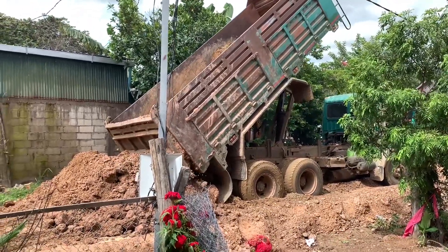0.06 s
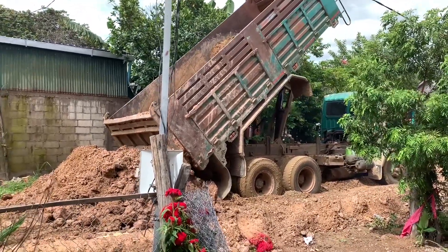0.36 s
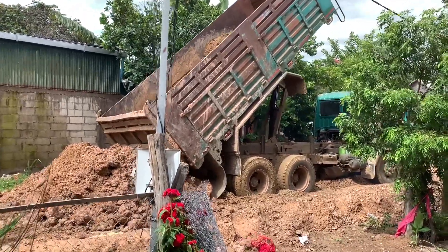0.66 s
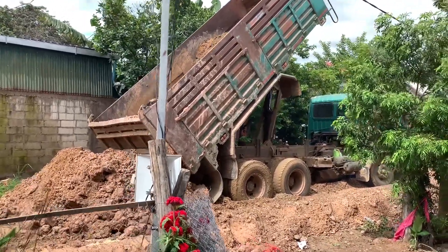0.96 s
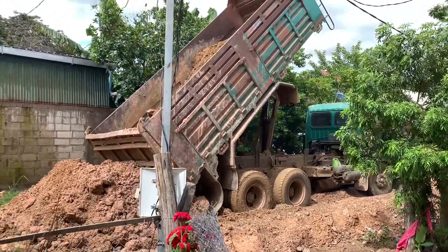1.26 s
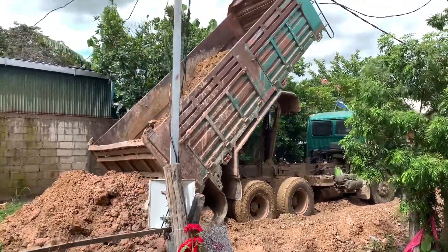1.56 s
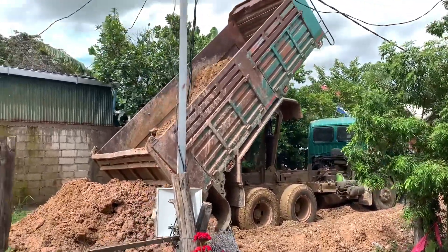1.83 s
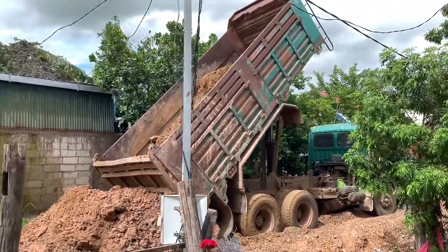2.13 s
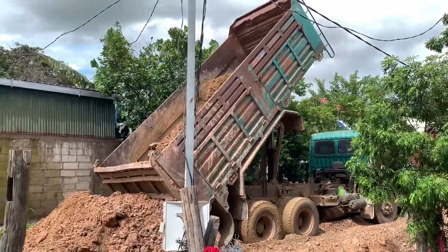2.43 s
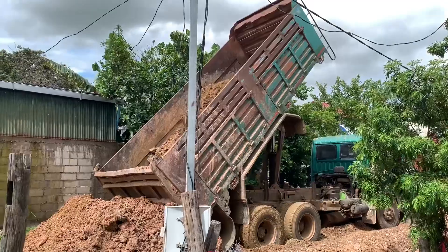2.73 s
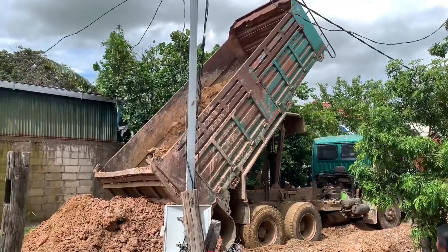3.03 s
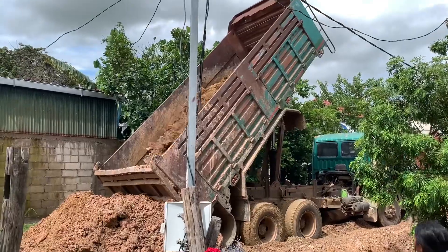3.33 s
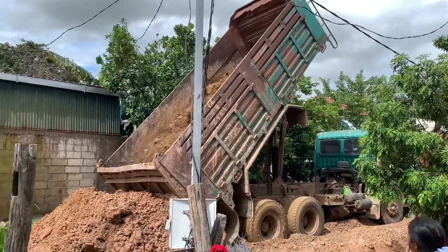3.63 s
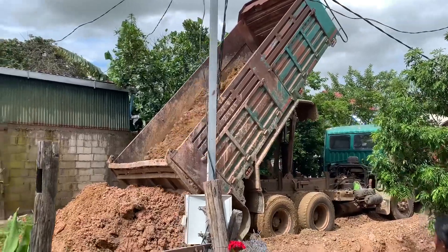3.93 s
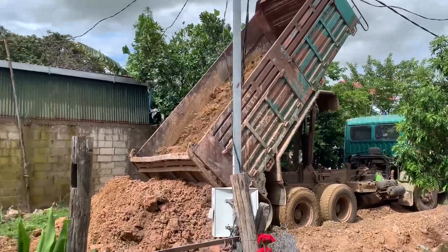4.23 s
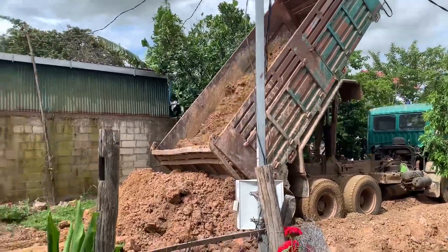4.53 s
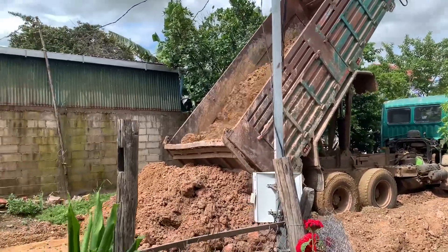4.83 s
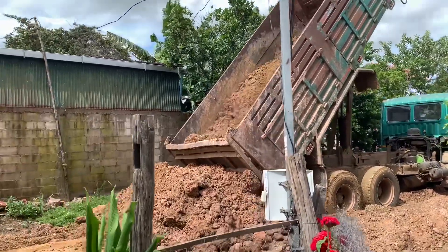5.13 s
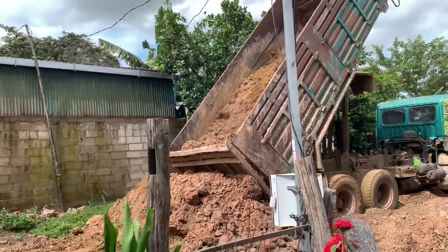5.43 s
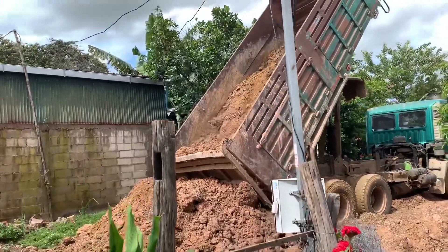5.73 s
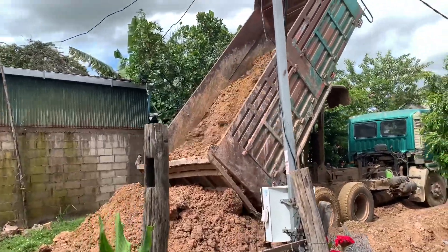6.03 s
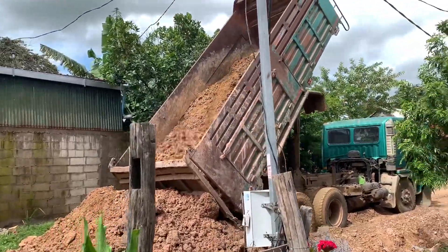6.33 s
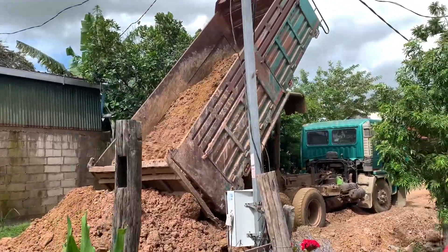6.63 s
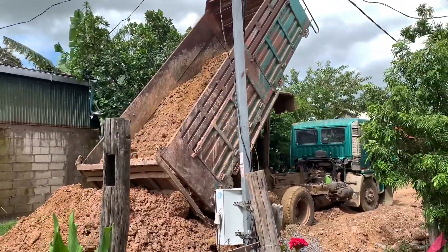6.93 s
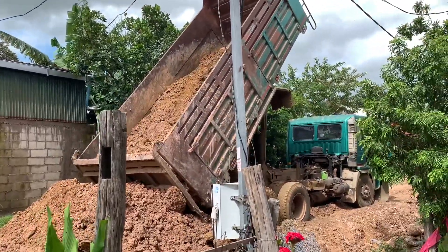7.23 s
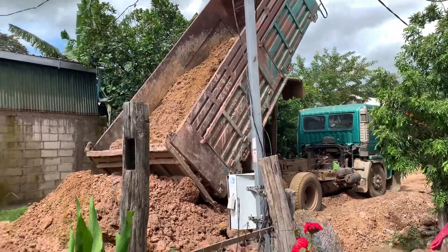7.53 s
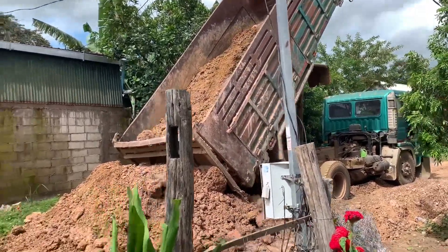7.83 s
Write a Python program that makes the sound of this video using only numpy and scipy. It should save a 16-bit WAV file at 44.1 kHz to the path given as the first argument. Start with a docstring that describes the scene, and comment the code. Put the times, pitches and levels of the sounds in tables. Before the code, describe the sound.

A dump truck's diesel engine throbs and clatters throughout, heard from some metres away in a walled yard. It revs high at about 0.4 seconds and sinks until 1.9, with a fine hydraulic hiss. A thin, faint hoist whine sounds from about 1.6 to 3.5 seconds, as the engine climbs to a second peak. A stone knocks at 2.6 seconds, and a loud cluster of sharp clanks hits the steel bed at 3.3. Soil slides out in a gritty, scraping rush, strongest near 3.8 and fading by 5.5, with many stones knocking and ringing briefly. Heavy clods thud onto the heap around 4.7 and 5.4 seconds, with a tiny stone squeak between. The engine gives a shorter, lighter rev at 5.7 and drops to a quieter idle by 7. A few scattered knocks and soft thuds follow, with a last clod landing at 8 seconds.

```python
"""A V8 diesel throbs and revs in a walled yard: a dump truck, speeding up three times to drive its hoist.
Exhaust pulses boom in the pipe, the block clatters and the hydraulics sing, then the engine drops to idle.
Soil slides down the raised steel bed; stones knock on its floor and heavy clods thud onto the heap.
Heard from some metres away, through the two microphone ports of a hand-held camera."""
import sys
import numpy as np
from scipy import signal
from scipy.fft import rfft, irfft, next_fast_len
from scipy.io import wavfile

SR = 44100
rng = np.random.default_rng(int(sys.argv[2]) if len(sys.argv) > 2 else 0)


def materialize(psi):
    """Save the field psi as 16-bit PCM at rate SR to the path in sys.argv[1].

    A 1-D psi becomes a single channel; in a 2-D psi each row is a channel.
    """
    bounded = np.clip(np.atleast_2d(psi).T, -1, 1)
    quanta = np.round(bounded * 32767).astype(np.int16)
    wavfile.write(sys.argv[1], SR, quanta)


N = 355446
T = np.arange(N) / SR


# Three revs, then idle. Each row: time in seconds, four-stroke cycles a second.
ENGINE_SPEED = [(0.0, 15.92), (0.35, 19.4), (0.51, 18.5), (0.95, 14.09), (1.4, 10.05), (1.85, 7.13),
                (2.25, 9.49), (2.87, 14.1), (3.3, 16.96), (3.54, 17.33), (4.04, 12.52), (4.52, 9.06),
                (4.95, 6.13), (5.25, 7.47), (5.7, 15.04), (5.97, 12.6), (6.52, 9.17), (6.94, 6.75),
                (8.06, 7.29)]
def crankshaft():
    """The engine's pace: cycles a second, and cycles turned so far."""
    speed = curve(ENGINE_SPEED)
    return speed, np.cumsum(speed) / SR


# The hoist's load, which lets go once the bed is up. Each row: time in seconds, load in dB.
HOIST_LOAD = [(0, 1.5), (1.6, -1.5), (3, 1), (4.6, -5), (5.1, -12), (5.45, -6.5), (6.1, -15), (8.06, -31)]
# How hard the exhaust pushes. Each row: time in seconds, level in dB.
EXHAUST_PUSH = [(0, -27), (.35, -26), (.7, -28.5), (1.1, -34.5), (1.42, -35), (1.68, -32.5), (1.9, -34.5),
                (2.25, -31.5), (2.7, -30.5), (3, -29), (3.45, -29), (4.15, -32.5), (4.45, -35.5),
                (4.68, -29), (5.1, -40), (5.6, -36), (5.95, -36), (6.45, -41.5), (8.06, -40)]
# A V8 bank's uneven firing. Each row: multiple of the cycle rate, dB under load, dB change running free.
ENGINE_ORDERS = [(2, -9, 3), (3, 4.5, 4), (4, -2.5, -19), (5, 2, 4), (6, -6, -16), (7, -3.5, 1),
                 (8, 3, -8.5), (9, -10, 1.5), (10, -8, 7), (11, -17, -26), (12, -8, 1), (13, -10, -1),
                 (14, -7.5, -16), (15, -11.5, -1), (16, -4.5, -6.5), (17, -8, -10), (18, -14.5, -14),
                 (20, -6.5, 0), (21, -7, -18), (22, -20.5, 6), (24, -8.5, -4), (32, -12.5, 2)]
# The tailpipe's resonances and its rumble. Each row: frequency in Hz, level in dB.
PIPE_SPECTRUM = [(18, -52), (28, -40), (35, -49), (43, -10.5), (52, -5.5), (63, 1.5), (75, -3), (90, -2.5),
                 (115, -7), (150, -5), (190, -10.5), (240, -1), (280, -9), (308, -6), (345, -12.5),
                 (410, -8.5), (480, -9), (650, -25)]
RUMBLE_SPECTRUM = [(20, -33), (35, 3), (50, 29), (66, 0), (90, 14), (140, 17), (200, 1), (400, -59)]
def exhaust(speed, cycles, tone_db=3, rumble_db=-11, chug_db=0.77, rasp_db=2, ragged_db=4):
    """Engine orders glide through the pipe's resonances and throb once a cycle, over a loose rumble."""
    load_db = curve(HOIST_LOAD)
    running_free = np.clip(-load_db / 10, 0, 1) ** 2
    # no two firings are equally strong
    firings = np.interp(cycles * 8, np.arange(2000), rng.standard_normal(2000))
    tone = np.zeros(N)
    for order, db, free_change_db in ENGINE_ORDERS:
        # low orders arrive as one push a cycle; higher ones are scattered and break up
        phase = 0.035 * order ** 2 + (order > 5) * rng.random()
        phase += 0.0044 * max(order - 8, 0) * wander(11)
        high = np.clip((order * speed - 100) / 130, 0, 1)
        flicker_db = wander(14) + high * ragged_db * (np.clip(wander(9), -2, 1.2) - .5)
        sharpness_db = high * (load_db + rasp_db * firings)  # load sharpens the firing
        level_db = db + running_free * free_change_db + read(PIPE_SPECTRUM, order * speed)
        tone += amp(level_db + sharpness_db + flicker_db) * np.cos(2 * np.pi * (order * cycles - phase))
    rumble = amp(rumble_db) * noise(RUMBLE_SPECTRUM)
    return amp(curve(EXHAUST_PUSH)) * (amp(tone_db + chug_db * firings) * tone + rumble)


# Dull roar and metal clatter at the engine. Each row: frequency in Hz, level in dB.
ROAR_SPECTRUM = [(50, -20.5), (110, 1.5), (160, 2), (195, 1.5), (240, -3.5), (290, -7), (400, -5.5),
                 (520, -0.5), (650, -3), (1200, -12), (3000, -73.5)]
CLATTER_SPECTRUM = [(200, -34.5), (400, -16.5), (520, -1.5), (680, -1), (900, -4.5), (1250, -2),
                    (1750, -2.5), (2100, -5.5), (2480, -30.5), (3600, -22), (5200, -38), (7000, -61),
                    (15000, -68)]
# Ringing engine panels. Each row: pitch in Hz, width in Hz, dB against the clatter.
ENGINE_PANELS = [(1497, 81, -16.5), (1745, 41, -12), (2125, 33, -20.5)]
def engine_block(speed, cycles, idle_roar_db=-55, idle_clatter_db=-54):
    """Each of eight firings a cycle gives a puff of gas and a rattle that rings the panels."""
    pulses = 0.47 + np.exp(-(cycles * 8 % 1) / 0.95)
    roar_gain = np.hypot(effort(speed, db=-38, octave_db=2.5, load_share=1), amp(idle_roar_db))
    clatter_gain = np.hypot(effort(speed, db=-37.5, octave_db=6, load_share=3.36), amp(idle_clatter_db))
    roar = noise(ROAR_SPECTRUM, pulses)
    clatter = noise(CLATTER_SPECTRUM, pulses)
    for hz, width_hz, db in ENGINE_PANELS:
        clatter += amp(db) * resonance(pulses * rng.standard_normal(N), hz, width_hz)
    return roar_gain * roar + clatter_gain * clatter


# Soil giving way on the bed. Each row: time of the peak in seconds, level in dB,
# swell and decay in seconds, dB of its grit against the soil.
SLUMPS = [(3.75, -30.5, 0.36, 0.61, -11), (3.81, -34, 0.01, 0.043, -21), (4.35, -42.5, 0.2, 0.58, -15),
          (5.44, -43, 0.1, 0.027, -18), (5.66, -51, 0.035, 0.045, -12), (6.18, -82, 0.067, 0.12, 19.5),
          (7.38, -54, 0.0091, 0.043, -21)]
def soil_flow():
    """Gain of the sliding soil: the sum of its slumps."""
    return sum(amp(db) * slump(s, swell_s, decay_s) for s, db, swell_s, decay_s, _ in SLUMPS)


# Crumbs on steel. Each row: frequency in Hz, level in dB.
SOIL_SPECTRUM = [(200, -14), (400, -4), (700, 0), (900, 0), (1150, 3), (1600, 4.5), (2000, 1), (2500, -12),
                 (3700, -11), (5200, -15.5), (6500, -24), (7600, -50), (15000, -73)]
def soil(level_db=-1, surge_db=3):
    """Crumbs scrape down the steel in small surges and pour onto the heap with a dull rush."""
    crumbs = unit_rms(colour(grains(per_s=2200, spread_db=0.5), SOIL_SPECTRUM))
    pour = noise(ROAR_SPECTRUM)
    return amp(level_db) * soil_flow() * (amp(surge_db * wander(45)) * crumbs + pour)


# The steel bed when struck. Each row: frequency in Hz, level in dB.
BED_SPECTRUM = [(200, -0.5), (600, 1), (950, 3), (1200, 1), (1500, 8), (1900, 8.5), (2200, 1), (2550, -1),
                (3700, -4.5), (5000, -7), (7400, -18), (8300, -11.5), (11000, -22.5), (15000, -33)]
# Large stones on the bed. Each row: start in seconds, level, treble and crack in dB,
# burst length in seconds, clank pitch in Hz.
STONE_HITS = [(1.9, -43, -10, 0, .008, 1500), (2.56, -25.5, -8, 1, 0.012, 1450),
              (3.281, -9, 0, -14, 0.0019, 2030), (3.284, -15, 1, 1.5, 0.0039, 940),
              (3.288, -10.5, -8, -9, 0.0011, 1800), (3.295, -9, 8, -15, 0.0025, 1630),
              (3.318, -20.5, 8, -8, 0.0097, 1920), (3.622, -19.5, -9, 9, 0.0073, 1410),
              (3.685, -30, 4, 0, 0.0059, 1600), (3.722, -24, -3, 4, .008, 1800),
              (3.788, -20.5, -12, -2, 0.0038, 2000), (3.802, -21, -4, 5, 0.008, 1440),
              (3.843, -20, 2, -6, 0.0042, 1740), (4.081, -20.5, -4, -2, 0.0017, 1820),
              (4.107, -16.5, 0, -2, 0.0021, 1610), (4.239, -19, -4.5, 5, 0.0031, 1840),
              (4.370, -24.5, -16, -10, 0.0016, 1670), (4.388, -28, -14, -6, 0.0033, 1553),
              (4.418, -14.5, -2, 5, 0.0028, 1490), (4.449, -26, -4, -8, 0.0026, 1390),
              (4.483, -13, -5, -3, 0.0019, 1660), (4.736, -22, -8, 6, 0.0016, 1950),
              (4.782, -22, -9, -5, 0.0024, 1600), (4.844, -19, 2.5, 2.5, 0.0023, 2020),
              (5.028, -22.5, -14, -1, 0.0029, 1755), (5.101, -27.5, -17, -3, 0.0022, 1800),
              (5.114, -29, -26, -14, 0.0021, 1570), (5.204, -22.5, -8.5, 13, 0.0032, 1700),
              (5.447, -18.5, -8, 2, 0.0042, 1638), (5.455, -35, -11, 0, 0.0024, 1860),
              (5.571, -44, -5, -13, 0.00087, 900), (6.605, -25, -12, 7, 0.0018, 1750),
              (6.622, -36, -7, 5, 0.0061, 1560), (6.906, -49, -16, 0, 0.0053, 1360),
              (7.064, -39.5, -14, 0, 0.0028, 1750), (7.073, -34.5, -13, 5, 0.004, 1450),
              (7.088, -38.5, -21, 0, 0.01, 1370), (7.378, -45, -4, 9, .006, 1510),
              (7.396, -45, -6, 4, 0.0053, 1400), (7.72, -54, -5, 5, 0.0047, 1090)]
def stones(level_db=3, treble_hz=2400, crack_hz=3450):
    """Each stone strikes its own patch of the bed, which clanks at its own pitch; hard ones also crack."""
    out, hz = np.zeros(N), np.geomspace(200, 15000, 160)
    for s, db, treble_db, crack_db, length_s, clank_hz in [*STONE_HITS, *pebbles()]:
        clank = 6 * np.exp(-((hz - clank_hz) / 210) ** 2)
        crack = crack_db * np.exp(-((hz - crack_hz) / 950) ** 2)
        spectrum = np.c_[hz, read(BED_SPECTRUM, hz) + clank + crack + treble_db * (hz > treble_hz)]
        add(out, s, amp(db + level_db) * blow(spectrum, length_s, tail_db=-14, tail_s=0.016))
    return out


def pebbles(count=22, from_s=3.7, to_s=5.0, spread_db=3, length_s=0.0029, low_hz=1300, high_hz=2050):
    """Small stones tumble at random, as strong as the soil that carries them; rows as in STONE_HITS."""
    when, size, bright, hard, pitch = rng.random((count, 5)).T
    s = from_s + (to_s - from_s) * (np.arange(count) + when) / count
    db = 20 * np.log10(np.interp(s, T, soil_flow())) + 4 + spread_db * (2 * size - 1)
    treble_db = -5 + spread_db * (2 * bright - 1)
    clank_hz = low_hz + (high_hz - low_hz) * pitch
    return np.c_[s, db, treble_db, spread_db * hard, np.full(count, length_s), clank_hz]


# The steel floor's modes. Each row: pitch in Hz, level in dB, seconds to fall 60 dB.
FLOOR_MODES = [(947, -6, .16), (1766, -6, .07), (1965, -7, .09), (3666, -24, .06), (5039, -20, .04)]
def bed_ring(knocks, ring_db=-47):
    """The knocks, with the steel floor ringing on after each."""
    t = T[:SR // 4]
    ring = sum(amp(db - 60 * t / t60) * np.sin(2 * np.pi * hz * t) for hz, db, t60 in FLOOR_MODES)
    return knocks + amp(ring_db) * signal.oaconvolve(knocks, ring)[:N]


# A thud on the heap. Each row: frequency in Hz, level in dB.
HEAP_SPECTRUM = [(25, -52), (70, -19), (115, 3), (160, 1.5), (240, -14), (450, -9), (1000, -14),
                 (1700, -18.5), (2500, -44), (9000, -42), (15000, -65)]
# Clods landing. Each row: start in seconds, level in dB, dB of the crumbling against the thud,
# burst length in seconds, boom pitch in Hz, boom level in dB.
CLOD_FALLS = [(3.287, -16.5, -4.5, 0.0041, 139, -42), (4.673, -22.5, 7, 0.022, 115.7, -20.5),
              (5.35, -29, -15.5, 0.12, 68.4, -22.5), (5.445, -35.5, 2, 0.0055, 117, -46),
              (6.604, -40.5, 6, 0.0053, 109, -50), (7.11, -42, -3, 0.042, 64.7, -28),
              (7.993, -25.5, 6, 0.019, 112, -36)]
def clods(level_db=3, crumbling_hz=200, swell_s=0.04):
    """Heavy clods thud onto the heap and crumble; each sets off a short low boom."""
    out, t = np.zeros(N), T[:SR // 2]
    hz, heap_db = np.transpose(HEAP_SPECTRUM)
    swell = (t / swell_s * np.exp(1 - t / swell_s)) ** 2
    for s, db, crumbling_db, length_s, boom_hz, boom_db in CLOD_FALLS:
        spectrum = np.c_[hz, heap_db + crumbling_db * (hz > crumbling_hz)]
        add(out, s, amp(db + level_db) * blow(spectrum, length_s, tail_db=7.5, tail_s=0.1))
        add(out, s, amp(boom_db) * swell * np.sin(2 * np.pi * boom_hz * t))
    return out


# Stone on steel. Each row: start and length in seconds, pitch and its rise in Hz, level in dB.
STONE_SCRAPES = [(5.167, 0.112, 1343, 122, -43.5), (5.211, 0.063, 937, 22.3, -43)]
def scrapes(jitter_hz=10):
    """A stone sticks and slips on the bed: a short arching squeal."""
    out = np.zeros(N)
    for s, length_s, hz, rise_hz, db in STONE_SCRAPES:
        arch = np.sin(np.linspace(0, np.pi, round(length_s * SR)))
        pitch = hz + rise_hz * arch + jitter_hz * wander(240)[:len(arch)]
        add(out, s, amp(db) * np.sqrt(2 * abs(arch)) * np.sin(radians(pitch)))
    return out


def skids(count=14, low_hz=1230, high_hz=2080, carried_db=-10, shaken_db=-45):
    """Gravel, carried by the soil or shaken loose by the hoist, briefly rings patches of steel."""
    pitches = low_hz + (high_hz - low_hz) * (np.arange(count) + rng.random(count)) / count
    rings = sum(resonance(grains(per_s=3.5, spread_db=3), hz, width_hz=28) / hz for hz in pitches)
    shaken = amp(shaken_db + 2 * curve(HOIST_LOAD))
    return unit_rms(rings) * np.hypot(amp(carried_db) * soil_flow(), shaken)


# The bright fizz of grit and hiss. Each row: frequency in Hz, level in dB.
FIZZ_SPECTRUM = [(2500, -12), (4000, -3), (6400, -3), (7700, -7), (8100, 7.5), (9000, -4.5), (10500, -6),
                 (12000, -10), (14500, -60), (16000, -92)]
def grit(decay_share=0.55, clump_db=4):
    """Dry grit trickles in clumps with each slump and runs out sooner than the soil."""
    flow = sum(amp(db + grit_db) * slump(s, swell_s, decay_s * decay_share)
               for s, db, swell_s, decay_s, grit_db in SLUMPS)
    clumps = amp(clump_db * wander(50))
    return flow * clumps * unit_rms(colour(grains(per_s=2700, spread_db=-0.5), FIZZ_SPECTRUM))


# Stray chips. Each row: start in seconds, level in dB, burst length in seconds.
GRIT_TICKS = [(3.686, -33, 0.0024), (4.277, -33, 0.0015), (4.982, -47, 0.0014), (5.070, -42, 0.0017),
              (5.572, -43, 0.0011), (6.408, -48, 0.0013), (6.859, -55, .001), (7.170, -54, 0.0053),
              (7.480, -55, 0.0099)]
def ticks(level_db=2):
    """Single chips of grit tick brightly."""
    out = np.zeros(N)
    for s, db, length_s in GRIT_TICKS:
        add(out, s, amp(db + level_db) * blow(FIZZ_SPECTRUM, length_s, tail_db=-28, tail_s=.012))
    return out


def pump(speed, hz=742, octave_hz=25, width_hz=45, level_db=-49):
    """A fuzzy resonance of the hydraulics swells with the load and rises a little with engine speed."""
    waver_db = 3 * np.tanh(wander(7))
    gain = amp(level_db + 1.16 * curve(HOIST_LOAD) + waver_db)
    fuzz = wander(width_hz) + 1j * wander(width_hz)
    return gain * (fuzz * np.exp(1j * radians(hz + octave_hz * octaves(speed)))).real


# The whine from the hoist. Each row: time in seconds, level in dB.
WHINE_LEVEL = [(0, -80), (1.6, -62), (1.7, -43), (1.87, -49.5), (2.2, -48), (2.35, -54), (3.2, -48),
               (4.3, -65), (5.2, -88)]
def whine(speed, hz=730, octave_hz=22, jitter_hz=8, waver_db=2):
    """The hydraulics sing a thin tone that rises a little with engine speed."""
    pitch = hz + octave_hz * octaves(speed) + jitter_hz * wander(40)
    return amp(curve(WHINE_LEVEL) + waver_db * wander(11)) * np.sqrt(2) * np.sin(radians(pitch))


# The smooth top of the hoist's hiss. Each row: frequency in Hz, level in dB.
SPRAY_SPECTRUM = [(6000, -4.5), (10000, 4), (13400, -2), (14300, -5), (15000, -29)]
def hiss(speed, flutter_db=2, idle_db=-72, spurt_s=0.23, spurt_db=-42):
    """The working hoist hisses finely, with one early spurt."""
    hoist = effort(speed, db=-52, octave_db=4.5, load_share=1)
    spurt = amp(spurt_db) * np.exp(-((T - spurt_s) / 0.15) ** 2)
    gain = np.sqrt(hoist ** 2 + spurt ** 2 + amp(idle_db) ** 2)
    fizz = unit_rms(colour(grains(per_s=9000, spread_db=-2.5), FIZZ_SPECTRUM))
    spray = effort(speed, db=-49.5, octave_db=4, load_share=1.46) * noise(SPRAY_SPECTRUM)
    return gain * amp(flutter_db * wander(35)) * fizz + spray


def wide_sources(speed, cycles):
    """What reaches the microphone from a wide area: engine block, hoist and sliding soil."""
    return engine_block(speed, cycles) + pump(speed) + soil() + hiss(speed) + grit()


# The truck's rattle, off the walls. Each row: frequency in Hz, level in dB.
RATTLE_SPECTRUM = [(60, -26), (150, -10), (250, 11), (390, 7), (540, 0), (800, -5.5), (1150, 15),
                   (1500, -18), (2150, 2), (2550, -9), (4000, -11.5), (5200, -6), (8200, -71), (15000, -91)]
def yard_rattle(speed, idle_db=-56):
    """The truck's loose rattle comes back from all round the yard, in two channels."""
    gain = np.hypot(effort(speed, db=-48, octave_db=14, load_share=3), amp(idle_db))
    flutter = amp(-0.5 * wander(55))
    return gain * flutter * np.array([noise(RATTLE_SPECTRUM) for _ in range(2)])


def yard_echo(x, patterns=5, drift_per_s=1.259, t60_s=0.13, level_db=-2.5):
    """Walls scatter a short tail in two channels; its pattern shifts as the camera moves."""
    t = T[:SR // 4]
    decay = amp(-60 * t / t60_s) * (1 + 3.5 * np.exp(-t / 0.012))
    tails = rng.standard_normal((patterns, 2, len(t))) * decay
    tails /= np.linalg.norm(tails, axis=2, keepdims=True)
    tails = signal.sosfilt(signal.butter(3, 290, "high", fs=SR, output="sos"), tails)
    shares = np.array([wander(drift_per_s) for _ in range(patterns)])
    shares /= np.linalg.norm(shares, axis=0)
    return amp(level_db) * sum(signal.oaconvolve((share * x)[None], tail, axes=1)[:, :N]
                               for share, tail in zip(shares, tails))


def effort(speed, db, octave_db, load_share):
    """Gain of a part that grows louder with engine speed and with the load on the hoist."""
    return amp(db + octave_db * octaves(speed) + load_share * curve(HOIST_LOAD))


def octaves(speed, mid_speed=12):
    """Engine speed in octaves above the middle of its range."""
    return np.log2(speed / mid_speed)


def slump(s, swell_s, decay_s):
    """Swells to 1 at time s and dies away."""
    return np.exp(-np.maximum((s - T) / swell_s, (T - s) / decay_s))


def blow(spectrum, length_s, tail_db, tail_s):
    """A lump crushes in a short burst and sheds crumbs; peak 1."""
    t = T[:SR // 3]
    age = t / length_s
    crush = (age * np.exp(1 - age)) ** 2
    crumbs = amp(tail_db) * (1 - np.exp(-age)) * np.exp(-t / tail_s)
    hit = colour((crush + crumbs) * rng.standard_normal(len(t)), spectrum)
    return hit / abs(hit).max()


def grains(per_s, spread_db):
    """Random tiny impacts of uneven size."""
    size = amp(spread_db * np.minimum(rng.exponential(1, N), 4.5))
    return unit_rms(size * rng.choice([-1, 1], N) * (rng.random(N) < per_s / SR))


def noise(spectrum, pulses=1):
    """Coloured noise, steady or pulsed; rms 1."""
    return unit_rms(colour(pulses * rng.standard_normal(N), spectrum))


def resonance(x, hz, width_hz):
    """One ringing band; rms 1."""
    pole = np.exp((2j * np.pi * hz - np.pi * width_hz) / SR)
    return unit_rms(signal.lfilter([1], [1, -pole], x).real)


def colour(x, spectrum, size=4096):
    """Causal filter with the given spectrum."""
    log_gain = np.log(amp(read(spectrum, abs(np.fft.fftfreq(size, 1 / SR)))))
    taps = np.fft.ifft(np.exp(np.conj(signal.hilbert(log_gain)))).real
    return signal.oaconvolve(x, taps[:size // 2] if len(x) < SR else taps)[:len(x)]


def wander(per_s):
    """Random drift; rms 1."""
    return unit_rms(np.interp(T * per_s, np.arange(2000), rng.standard_normal(2000)))


def read(points, hz):
    """Reads a table on a log-frequency axis."""
    f, value = np.transpose(points)
    return np.interp(np.log(hz + 1), np.log(f + 1), value)


def curve(rows):
    """A (time, value) table at every sample."""
    return np.interp(T, *np.transpose(rows))


def add(mix, s, sound):
    """Mixes a sound in at time s."""
    part = mix[round(s * SR):][:len(sound)]
    part += sound[:len(part)]


def radians(hz):
    """Running phase of a gliding pitch."""
    return 2 * np.pi * np.cumsum(hz) / SR


def amp(db):
    """Decibels to gain."""
    return 10 ** (np.asarray(db) / 20)


def unit_rms(x):
    """Scales to rms 1."""
    return x / np.sqrt(np.mean(x ** 2) + 1e-20)


# At the microphone ports. Each row: frequency in Hz, then the value noted alongside.
MIC_PHASE = [(200, 0), (390, 0), (430, 1), (470, 2.4), (545, 3.14), (730, 5.2), (1000, 7.8), (1130, 9.3),
             (1350, 11.8), (1600, 11.7), (2000, 11.2), (2400, 10.6), (2550, 9.5), (3150, 9.3), (3700, 6.6),
             (4200, 6), (4800, 3.3), (5400, 3.1), (5900, 6), (6500, 6.4), (7100, 9.3), (7500, 9.4),
             (8200, 11.9), (9000, 14.3), (10000, 12.6), (11000, 11), (11900, 9.4), (13100, 6.3),
             (14000, 5.9), (14300, 3.1)]  # radians by which left leads
MIC_BALANCE = [(200, 0), (290, -3), (350, 0), (1000, 0), (2200, .7), (3000, 0), (4500, -1.5), (6000, 0),
               (7900, 0), (8050, -9), (9000, -5.5), (10000, -4.5), (11300, 0)]  # left minus right in dB
MIC_OPPOSITE = [(120, -21), (280, -16), (430, -7.5), (600, -6.5), (1000, -21), (1300, -19), (1600, -14.5),
                (2000, -15.5), (2400, -10.5), (3500, -7.5), (9000, -5.5), (10500, -16), (13000, -8)]  # dB of the part arriving from the opposite side
ECHO_LIKENESS = [(300, .6), (430, .6), (500, .98), (600, .98), (1000, .85), (1300, .3), (2400, .4),
                 (2900, .85), (4300, .4), (5200, .9), (7400, .95), (8200, .2), (11000, .4), (12000, .9)]  # how alike the echoes are at the two ports, 0 to 1
def scene(wide_echo_db=-1.5, hit_echo_db=-2):
    """Truck and load in the walled yard, some metres from the two microphone ports."""
    speed, cycles = crankshaft()
    hits = bed_ring(stones()) + ticks() + clods() + scrapes()
    wide = wide_sources(speed, cycles)
    size = next_fast_len(N + 4096)
    hz = np.fft.rfftfreq(size, 1 / SR)
    direct = rfft(exhaust(speed, cycles) + whine(speed) + wide + hits + skids(), size)
    # wide sources also arrive from the opposite side, with the lag mirrored
    opposite = rfft(wide_sources(speed, cycles), size) * amp(read(MIC_OPPOSITE, hz))
    # the bass is alike at both ports: lag and balance fade in from 150 to 300 Hz
    apart = np.clip((hz - 150) / 150, 0, 1)
    lag = np.exp(-1j * apart * read(MIC_PHASE, hz))
    yard = yard_echo(amp(hit_echo_db) * hits + amp(wide_echo_db) * wide) + yard_rattle(speed)
    left_echo, other_echo = rfft(yard, size)
    alike = read(ECHO_LIKENESS, hz)
    right_echo = lag * (alike * left_echo + np.sqrt(1 - alike ** 2) * other_echo)
    ports = np.array([direct + opposite + left_echo, direct * lag + opposite / lag + right_echo])
    balance_db = apart * read(MIC_BALANCE, hz) / 2
    return irfft(ports * amp([balance_db, -balance_db]), size)[:, :N]


def record(dry, edge_hz=14700):
    """The camera cuts off the highest treble."""
    lowpass = signal.firwin(511, edge_hz, window=("kaiser", 9), fs=SR)
    return signal.oaconvolve(dry, lowpass[None], "same")


dry = scene()
out = record(dry)
materialize(out)
```